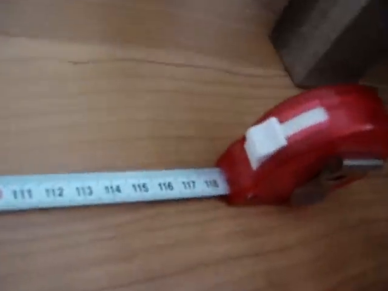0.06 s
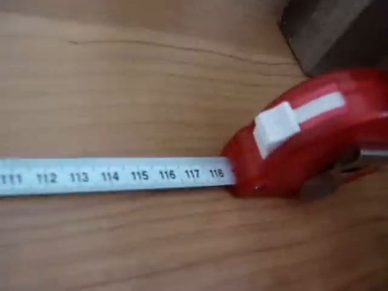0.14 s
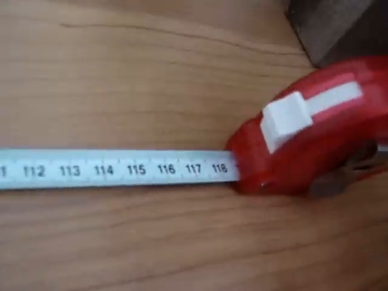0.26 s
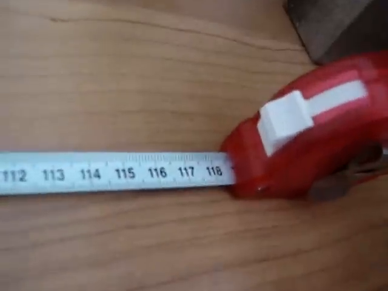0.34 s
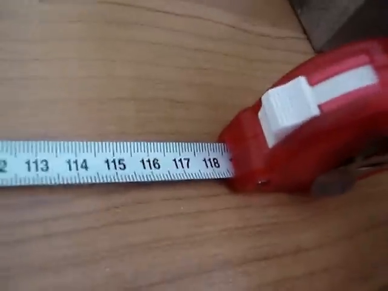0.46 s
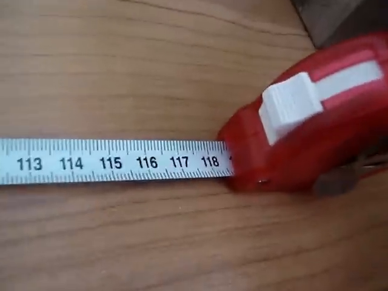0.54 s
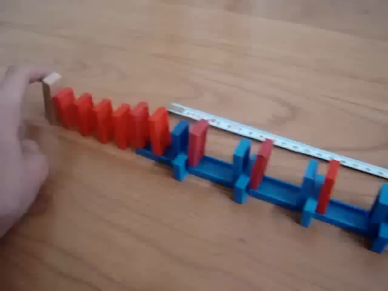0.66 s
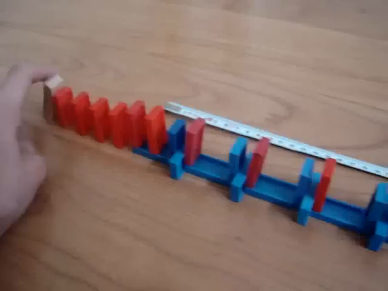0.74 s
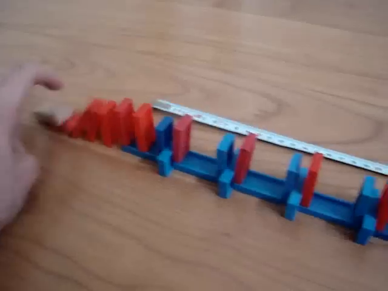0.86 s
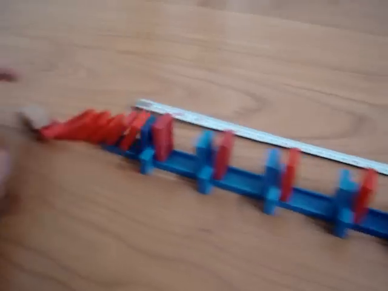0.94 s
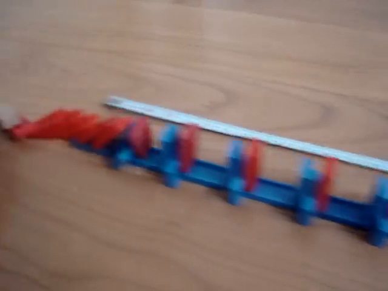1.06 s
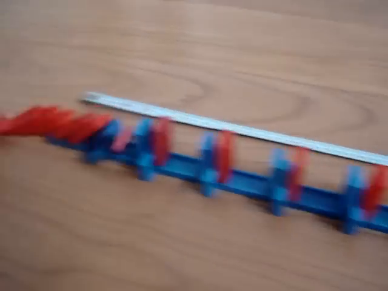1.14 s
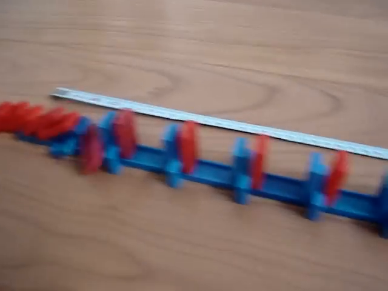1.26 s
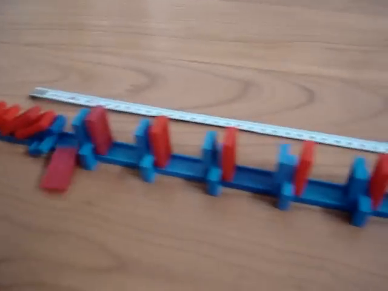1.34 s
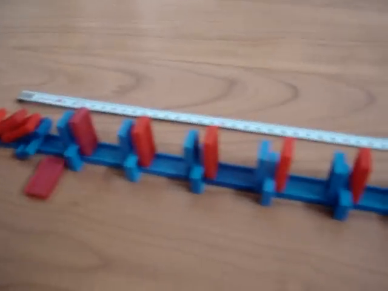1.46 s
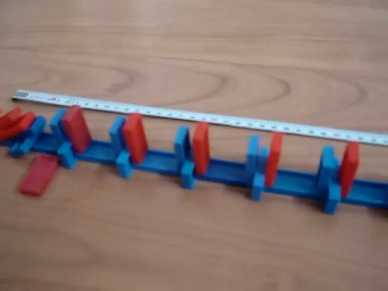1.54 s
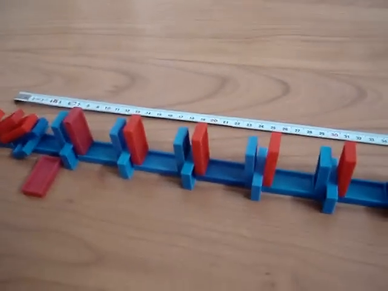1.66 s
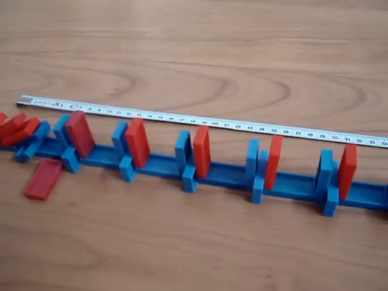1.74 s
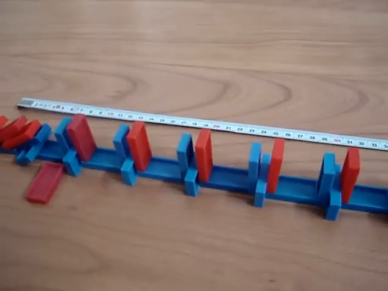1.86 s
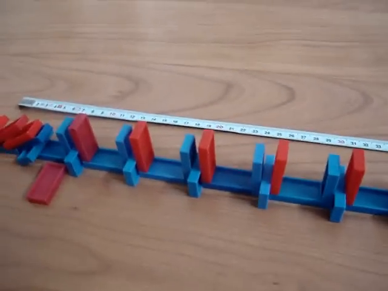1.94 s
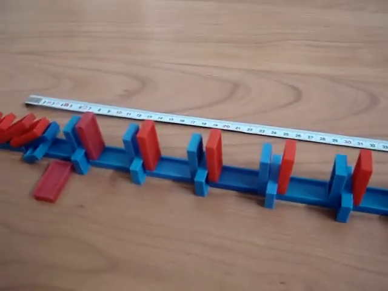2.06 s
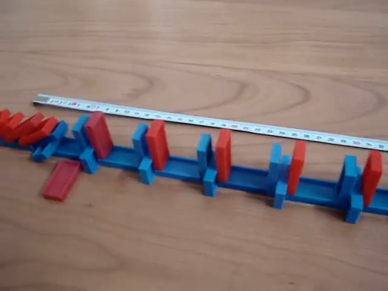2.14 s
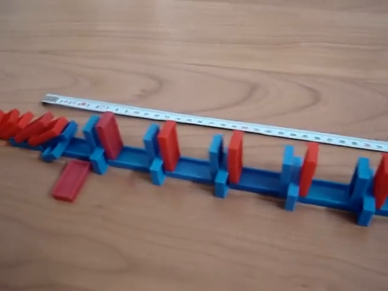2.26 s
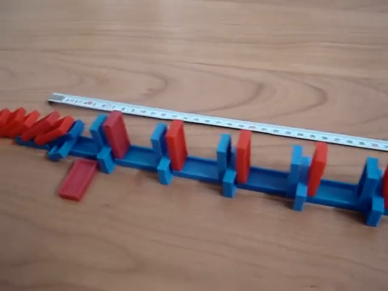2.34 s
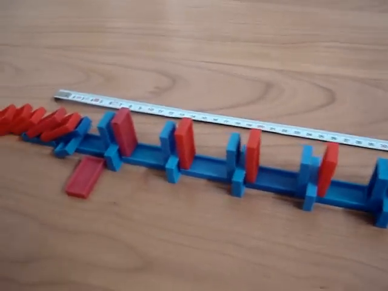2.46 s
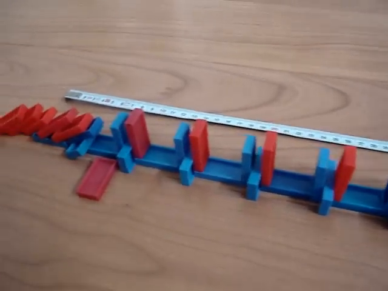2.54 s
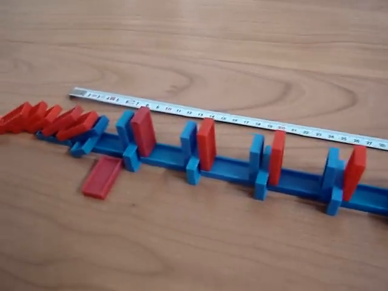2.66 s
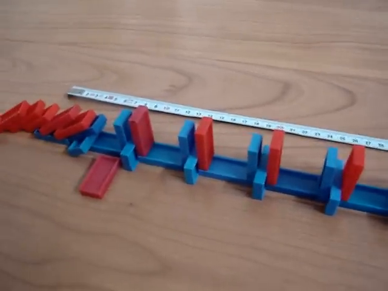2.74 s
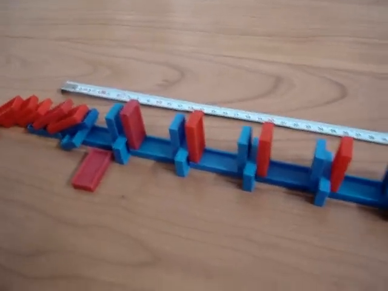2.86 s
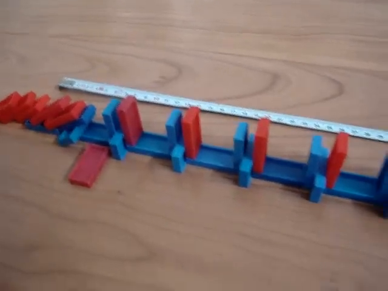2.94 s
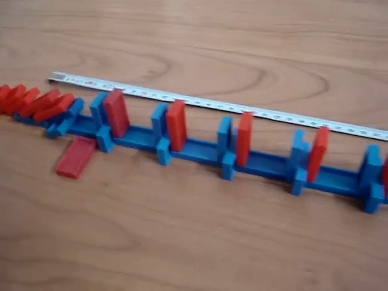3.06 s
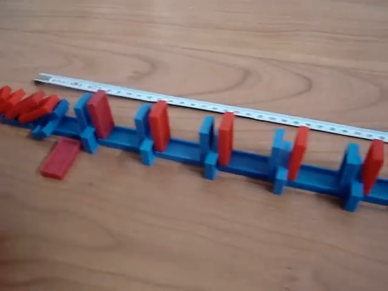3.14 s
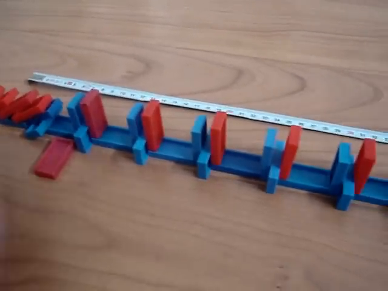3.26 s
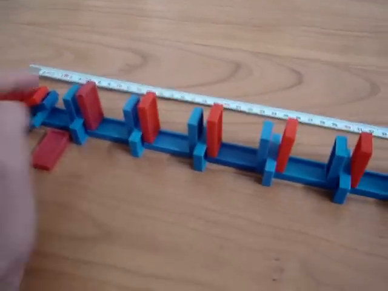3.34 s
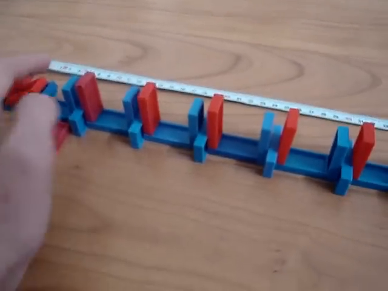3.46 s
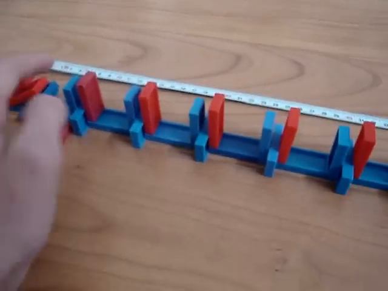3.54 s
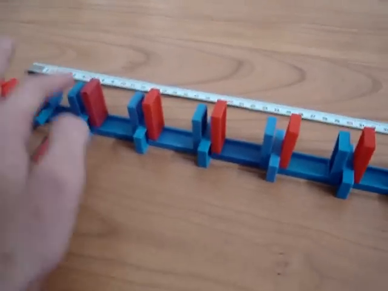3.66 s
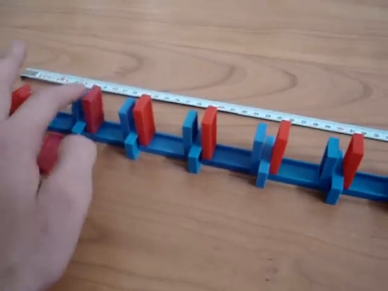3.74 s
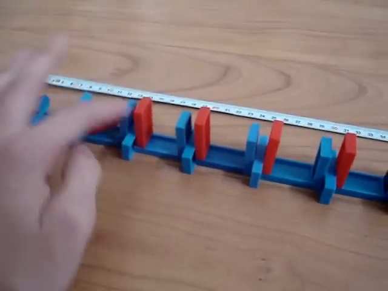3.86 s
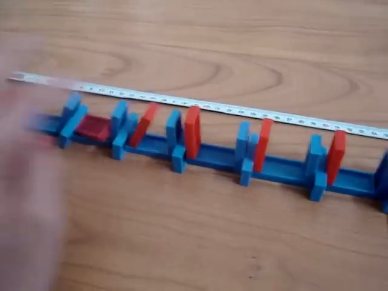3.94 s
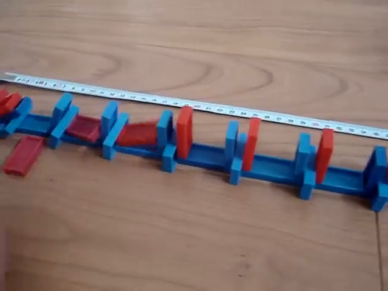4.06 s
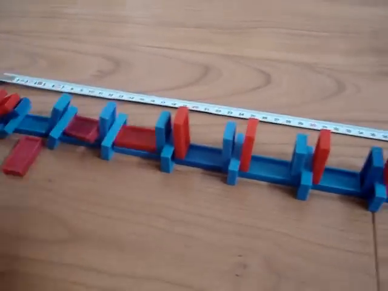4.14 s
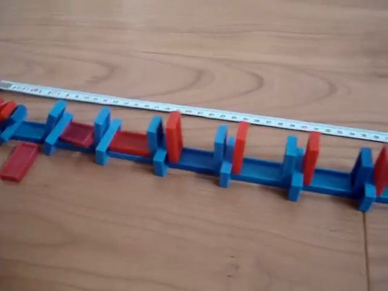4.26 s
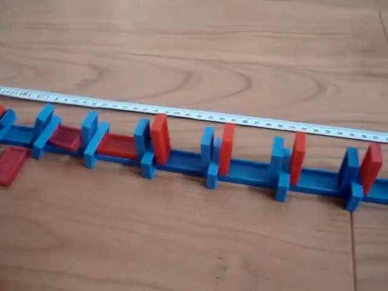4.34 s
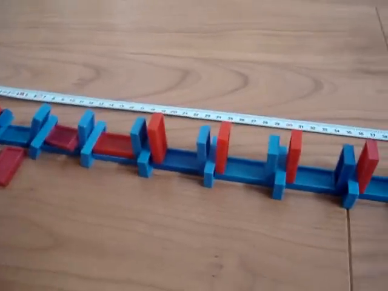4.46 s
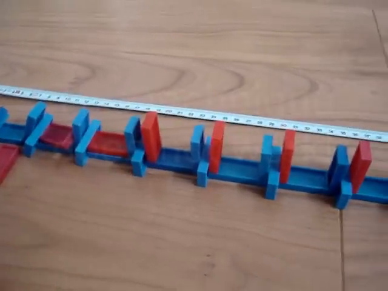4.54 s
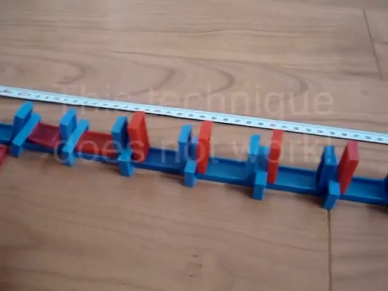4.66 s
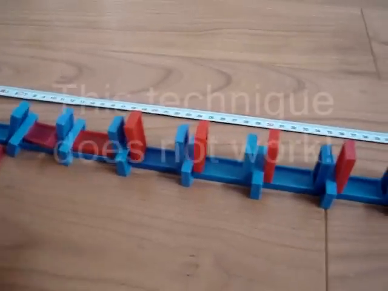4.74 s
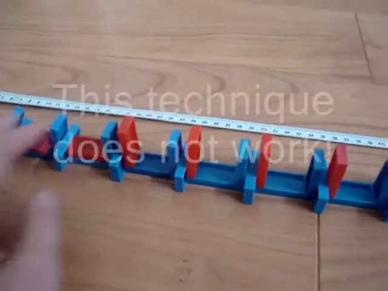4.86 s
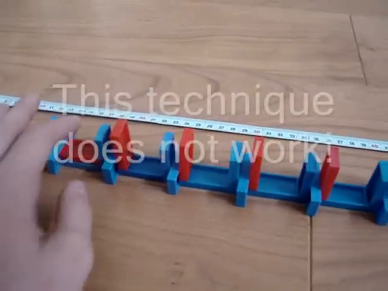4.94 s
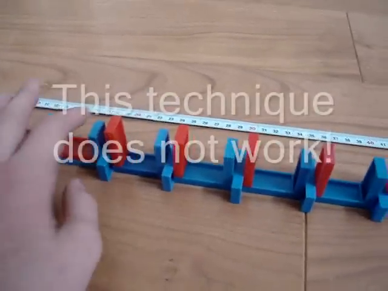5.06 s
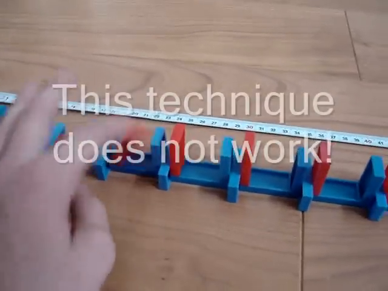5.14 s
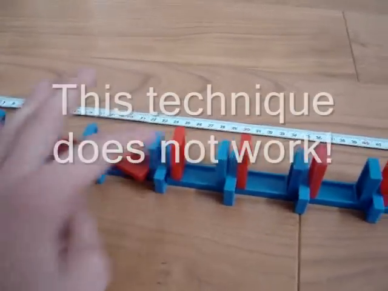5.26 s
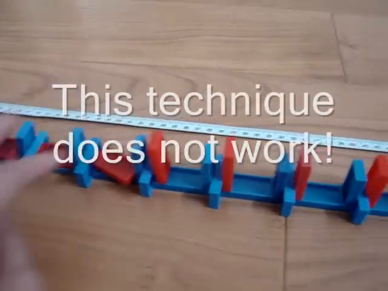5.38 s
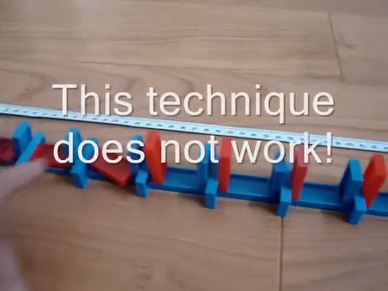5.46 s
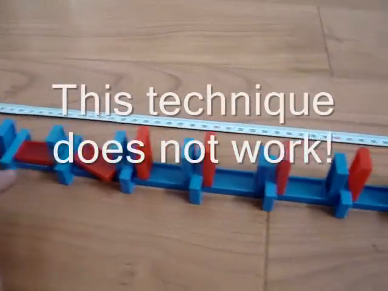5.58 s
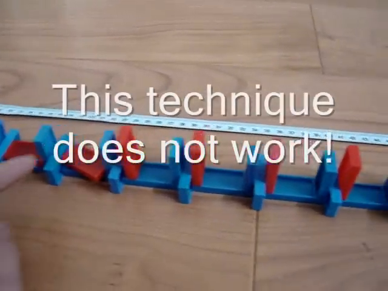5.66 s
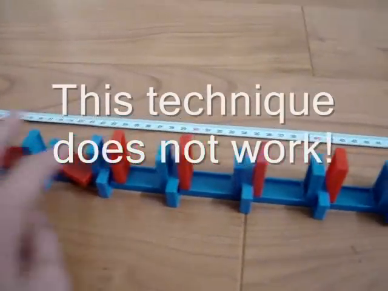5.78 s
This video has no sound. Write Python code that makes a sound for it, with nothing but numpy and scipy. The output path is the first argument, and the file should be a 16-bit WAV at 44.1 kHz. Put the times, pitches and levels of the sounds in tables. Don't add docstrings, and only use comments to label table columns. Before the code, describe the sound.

A soft, low-leaning hiss is cut by a small dry camera button click, then the background changes abruptly. A row of plastic dominoes topples close by on a wooden floor in a dense, bright clatter with lively room echoes. After a quiet pause with faint hum and hiss, single pushed tiles clack in a shorter burst, and a final quick rattle follows after another gap.

```python
import sys
import numpy as np
from scipy import signal
from scipy.fft import rfft, irfft
from scipy.io import wavfile
from scipy.ndimage import uniform_filter1d

SR = 44100
rng = np.random.default_rng(int(sys.argv[2]) if len(sys.argv) > 2 else 0)


def dump_mix(stems):
    frames = np.atleast_2d(stems).T
    limited = np.clip(frames, -1, 1)
    pcm = np.round(limited * 32767).astype(np.int16)
    wavfile.write(sys.argv[1], SR, pcm)


def field_ratio(decibels):
    return 10 ** (np.asarray(decibels, dtype=float) / 20)


N = 256220
TIME = np.arange(N) / SR
BLOW = 2048
PLACES = 4
LAG_S = 0.0008
SCENE_CHANGE_S = 0.792

# (time [s], peak level [dB], second ring against the peak [dB])
FIRST_ROW = [(.899, -28.5, -22), (.9547, -2.5, -13), (.9642, -11, -22), (.9859, -1.5, 0.5),
             (1.0044, -7, 0.5), (1.0178, -17, 16), (1.0294, -21.5, 21), (1.0424, -7.5, -12),
             (1.0546, -10.5, -9), (1.0815, -24.5, 19), (1.0894, -6, -22), (1.1064, -6, -22),
             (1.1194, -15, -20), (1.1494, -9.5, 4.5), (1.271, -13, 4), (1.3117, -15, -10),
             (1.3855, -3.5, -13), (1.3908, -21, -17.5), (1.4364, -6.5, -12), (1.4398, -4.5, -19),
             (1.4691, -4.5, -21.5), (1.4804, -11.5, -8), (1.4936, -7, -22), (1.5234, -11, -16),
             (1.5453, -18.5, -20), (1.5758, -12, -20)]
# (time [s], peak level [dB], second ring [dB], edge tick [dB]),
# the last two against the peak
PUSHED_TILES = [(3.9642, -12.5, 9, 1), (3.9732, -7.5, -0.5, -19), (3.9774, -13.5, 4, -12),
                (3.9964, -23, -3, 2), (4.025, -24.5, 9.5, -10), (4.1476, -9.5, 5, -3),
                (4.1574, -13, -4, 4.5), (4.1874, -23, -6, 0), (4.2244, -22.5, -3, -5),
                (4.2479, -20.5, 9.5, 1), (4.2579, -21, 1, -9), (5.3289, -6.5, 0.5, -10),
                (5.3414, -20.5, 9, 5), (5.3535, -14.5, 4, 2)]
# (time [s], slap level [dB], boards against the slap [dB])
DULL_TAPS = [(.8986, -37.5, 22.5), (.9049, -18.5, -12), (1.2004, -14.5, -7.5), (1.271, -24, -0.5),
             (1.3063, -23, -13), (3.044, -43, 12), (3.8162, -26.5, 3), (3.9223, -24, 1), (3.9329, -30, 9.5),
             (4.0961, -27, 0.5), (4.2579, -9, -18), (5.2675, -29, 0), (5.675, -39.5, -25),
             (5.76, -42.5, -1)]
# (time [s], peak level [dB], pitch [Hz], edge ring against the peak [dB])
FLAT_LANDINGS = [(1.1494, -12, 4200, -24), (1.3114, -8, 4310, -17), (1.323, -30, 3960, -23),
                 (1.3865, -7.5, 3200, -26), (1.39, -13.5, 2350, -29), (1.419, -10.5, 6400, -18),
                 (1.5284, -4.5, 4180, -36), (2.1224, -41, 2070, -20), (3.3294, -41, 2200, -16),
                 (3.817, -18.5, 5230, -30), (3.9214, -23.5, 3290, -26), (4.094, -14, 5280, -32),
                 (4.2245, -15.5, 4600, -9), (4.248, -14, 3150, -10.5), (4.2574, -25.5, 2770, -1.5),
                 (5.3326, -13, 5500, -30), (5.3447, -12, 5170, -30), (5.3654, -8.5, 3650, -24),
                 (5.3772, -11.5, 4300, -10), (5.3894, -4, 4600, -12), (5.405, -9, 3950, -24),
                 (5.4232, -6.5, 4720, -30), (5.4495, -19, 4500, -7)]
# (time [s], level [dB])
HEAP_CHATTER = [
    [(0.95, -20), (0.956, -15.5), (0.98, -14), (0.988, -12.5), (1.158, -19.5), (1.24, -40)],
    [(1.43, -41), (1.434, -45), (1.44, -27.5), (1.586, -26), (1.6, -58)],
    [(3.96, -27), (3.974, -28), (3.998, -28), (4.06, -53)],
]
# (time [s], peak level [dB], thump through the floor [dB])
HARD_CONTACTS = [(.899, -19, -61), (0.954, -16, -49), (.986, 3.5, -36), (1.2, -10, -67), (1.271, -10, -72),
                 (1.385, -1, -75), (1.439, 0, -63), (1.529, 0, -59), (3.042, -25.5, -78), (3.816, -18, -78),
                 (3.964, -0.5, -38.5), (4.095, -11.5, -70), (4.148, -13, -45), (4.224, -15, -65),
                 (4.247, -0.5, -62), (5.267, -43, -56), (5.328, -1, -48), (5.3651, -18, -46),
                 (5.3763, 9.5, -40), (5.4225, -10.5, -53)]

# (pitch [Hz], level [dB], time to fall by 60 dB [s])
TILE_RING = [(4881, 11.5, 0.04), (4760, 4.5, .012), (4933, 8.5, 0.035)]
SECOND_RING = [(6170, 8.5, 0.0084), (5640, -0.5, 0.017), (7020, -14.5, 0.032)]
FACE_SLAP = [(2480, -42.5, 0.012), (2964, 9, 0.01), (3500, 13.5, 0.005), (4020, 10, 0.0057)]
FLOOR_BOARDS = [(670, -4, 0.048), (920, 3.5, 0.0083), (1202, 1, 0.017), (1790, 11.5, 0.0033)]
TILE_EDGE = [(8030, -1, 0.018), (8950, -11, 0.06), (7270, 3, 0.013), (11240, -12.5, 0.0088),
             (12000, -12.5, 0.0036), (12900, -11, 0.0039), (13600, -27, .006), (14700, -11, 0.0054)]
# (lowest [Hz], highest [Hz])
SCRAPE_BAND = [4500, 8620]
# (band start [Hz], time to fall by 60 dB [s], level [dB])
ROOM_BANDS = [(100, 0.1, -36.5), (496, 0.59, -25.5), (1500, 0.5, -24.5), (3500, 0.44, -26.5),
              (4546, 0.3, -31), (5280, 0.4, -27.5), (6800, 0.39, -31), (12500, 0.48, -16.5)]

# (time [s], level [dB], tones as (pitch [Hz], level [dB], time to fall by 60 dB [s]))
CAMERA_BUTTON = (.7358, -4.5, [(4100, -4.5, 0.0096), (3600, -0.5, 0.0038), (1180, -12, .01),
                 (1890, -5, 0.0034), (5500, -6, 0.0037), (7850, -18.5, 0.0035), (13200, -26, .003)])
# (pitch [Hz], level per Hz [dB])
FIRST_HISS = [(15, -73), (25, -43), (70, -26), (119, -7.5), (161, -21), (194, -2), (261, -19), (283, -7.5),
              (391, -3), (746, -8.5), (1500, -13), (7790, -22.5), (15700, -27)]
# (pitch [Hz], level per Hz [dB])
SECOND_HISS = [(15, -34), (25, -18), (118, -12), (195, -7.5), (226, -16.5), (276, -3), (373, -13),
               (479, -13.5), (631, -14), (752, -13), (1550, -18.5), (7900, -26.5), (9900, -30),
               (12900, -61), (21800, -120)]
# (time [s], pitch [Hz], level [dB])
MOTOR_HUM = [
    (0.8, 275.6, -51.5),
    (1.01, 275.3, -45.5),
    (1.11, 274.3, -62),
    (1.53, 276.3, -61),
    (1.68, 274.1, -62.5),
    (3.24, 275.7, -53.5),
    (4.4, 275.4, -57.5),
    (5.31, 275.3, -55),
    (5.81, 275.6, -86),
]
# (pitch [Hz], width [Hz], level [dB])
WHINES = [(198.3, 15, -66), (7866, 69, -69.5), (8720, 52, -76.5), (7070, 10, -80.5), (12000, 80, -93.5),
          (15000, 6, -108.5), (2255, 230, -70.5), (753, 52, -69.5)]
# (time [s], change in level [dB])
TURN_DOWNS = [
    (1.5, -7),
    (4.1, -3),
    (5.45, -6),
]
# (start [s], end [s], thinned above
# [Hz], change in level [dB])
THIN_TREBLE = [(0.719, .733, 3200, -11), (0.787, 0.796, 110, -37), (0.868, .895, 3300, -5),
               (.938, 0.951, 3400, -11), (0.97, 0.987, 4200, -12), (1.26, 1.268, 6400, -9),
               (1.371, 1.38, 2000, -9.5), (1.404, 1.42, 3880, -14), (1.422, 1.436, 3900, -11),
               (3.786, 3.816, 3900, -15), (3.89, 3.913, 2600, -4), (4.225, 4.248, 6400, -13),
               (5.293, 5.323, 1500, -20), (5.367, 5.376, 6800, -7)]


def dominoes():
    places = np.zeros((PLACES, N))
    edge_db = -7
    knocks = [(*row, edge_db) for row in FIRST_ROW] + PUSHED_TILES
    for k, (s, db, second_db, edge_db) in enumerate(knocks):
        add(places[k % PLACES], s + LAG_S, knock(db, -6.5, second_db, -15, edge_db))
    for k, (s, db, boards_db) in enumerate(DULL_TAPS):
        add(places[k % PLACES], s + LAG_S, tap(db, boards_db))
    for k, (s, *settings) in enumerate(FLAT_LANDINGS):
        add(places[k % PLACES], s + LAG_S, landing(*settings))
    for rows in HEAP_CHATTER:
        chatter(places, rows)
    return places


def knock(db, slap_db, second_db, boards_db, edge_db):
    body = ring(TILE_RING, 0.003, 1.5)
    body = body + field_ratio(second_db) * ring(SECOND_RING, 0.006, 3)
    body = body + field_ratio(slap_db) * ring(FACE_SLAP, 0.05, 3)
    body = body + field_ratio(boards_db) * ring(FLOOR_BOARDS, 0.1, 3)
    body = body + field_ratio(edge_db) * ring(TILE_EDGE, 0.006, 3)
    swell_s = 0.0001
    return -field_ratio(db - 4.5) * body * np.minimum(TIME[:BLOW] / swell_s, 1)


def tap(db, boards_db):
    ring_db, second_db, edge_db = -10.5, -10, -9
    return knock(db + ring_db, -ring_db, second_db - ring_db, boards_db - ring_db, edge_db - ring_db)


def landing(db, hz, edge_db):
    tones = [(hz, 0, 0.009), (0.926 * hz, -3, 0.007), (1.144 * hz, -1.5, 0.007), (1.266 * hz, -4, 0.006)]
    slap = ring(tones, 0.039, 4.5)
    edge = field_ratio(edge_db) * ring([(9090, -6.5, 0.018), (8100, -9, 0.02)], 0, 0)
    scrape = band(rng.standard_normal(BLOW), *SCRAPE_BAND, order=3)
    scrape = field_ratio(-14) * scrape * np.exp(-TIME[:BLOW] / 0.0028)
    swell = np.minimum(TIME[:BLOW] / 0.00052, 1)
    return field_ratio(db + 2.0) * (slap + edge + scrape) * swell


def chatter(places, rows):
    s, db = np.transpose(rows)
    length_s = s[-1] - s[0]
    knocks = rng.random((int(200 * length_s), 2))
    for k, (moment, size) in enumerate(knocks):
        when = s[0] + moment * length_s
        knock_db = np.interp(when, s, db) - 7 - 3.35 * np.log(size)
        add(places[k % PLACES], when, knock(knock_db, -2.8, -5.0, -17, 5.8))


def ring(tones, detune, scatter_db):
    t = TIME[:BLOW]
    out = np.zeros(BLOW)
    for hz, db, fade_s in tones:
        off_pitch, off_level = rng.standard_normal(2)
        tone = np.sin(2 * np.pi * hz * (1 + detune * off_pitch) * t)
        out += field_ratio(db + scatter_db * off_level) * tone * 1000 ** (-t / fade_s)
    return out / np.abs(out).max()


def hard_contacts():
    out = np.zeros(N)
    t = TIME[:4096]
    thump = np.sin(2 * np.pi * 28 * t) * np.exp(-t / 0.021) * np.minimum(t / 0.0033, 1)
    for s, db, thump_db in HARD_CONTACTS:
        contact_ms = max(0.052 - 0.0006 * db, 0.02)
        add(out, s + LAG_S, field_ratio(db + 5.0) * crack(contact_ms / 1000))
        add(out, s, field_ratio(thump_db + 2.5) * thump)
    out = out - band(out, 90, 350)
    rounded = signal.butter(1, 11000, fs=SR, output="sos")
    return signal.sosfilt(rounded, out)


def crack(length_s):
    t = TIME[:BLOW] / length_s
    return -(1 - t / 2) * np.exp(-t) * np.minimum(t * 4, 1)


def room(x):
    t = TIME[:SR * 3 // 4]
    tops = [hz for hz, _, _ in ROOM_BANDS[1:]] + [16000]
    tail = np.zeros(len(t))
    for (hz, fade_s, db), top in zip(ROOM_BANDS, tops):
        echoes = band(rng.standard_normal(len(t)), hz, top)
        tail += field_ratio(db) * 1000 ** (-t / fade_s) * echoes
    onset = np.clip((t - 0.001) / 0.002, 0, 1)
    early = field_ratio(6.5 * np.exp(-(t / 0.014) ** 4))
    return signal.fftconvolve(x, tail * onset * early)[:N]


def button():
    out = np.zeros(N)
    s, db, tones = CAMERA_BUTTON
    add(out, s, -field_ratio(db) * ring(tones, 0, 0) * np.minimum(TIME[:BLOW] / 0.00019, 1))
    return out


def background():
    return np.where(TIME < SCENE_CHANGE_S, first_noise(), second_noise() + motor())


def first_noise():
    hiss = level(coloured(FIRST_HISS), -51) * field_ratio(0.24 * walk(5))
    return hiss + field_ratio(-69) * narrow(195, 25) + field_ratio(-64) * narrow(407.5, 12)


def second_noise():
    treble_db = -39.5
    hiss = coloured(SECOND_HISS[:-2] + [(10200, treble_db), (15700, treble_db + 2.5)])
    hiss = hiss / band(hiss, 400, 2000, order=4).std()
    gain_db = np.full(N, -55.0)
    for s, db in TURN_DOWNS:
        drop = np.clip((TIME - s) / 0.052, 0, 1)
        gain_db += db * drop * np.exp(-np.abs(TIME - s) / 1.34)
    whines = sum(field_ratio(db + 58.0) * narrow(hz, width) for hz, width, db in WHINES)
    return field_ratio(gain_db) * (field_ratio(0.29 * walk(17)) * hiss + whines)


def motor():
    loudness = curve([(s, db) for s, _, db in MOTOR_HUM])
    return loudness * (1.31 * np.sin(2 * np.pi * 275 * TIME) + 0.12 * narrow(272, 8))


def coloured(points):
    hz, db = np.transpose(points)
    log_hz = np.log(np.fft.rfftfreq(N, 1 / SR) + 1)
    shape = field_ratio(np.interp(log_hz, np.log(hz), db))
    return irfft(rfft(rng.standard_normal(N)) * shape, N)


def narrow(hz, width_hz):
    off = (np.fft.rfftfreq(N, 1 / SR) - hz) / (width_hz / 2)
    return level(irfft(rfft(rng.standard_normal(N)) / (1 + off ** 2), N), 0)


def walk(rate):
    k = int(SR / rate)
    steps = np.repeat(rng.standard_normal(N // k + 1), k)
    return 0.43 * uniform_filter1d(uniform_filter1d(steps, k), k)[:N]


def curve(rows):
    s, db = np.transpose(rows)
    return field_ratio(np.interp(TIME, s, db, left=-120, right=-120))


def level(x, db):
    return x * field_ratio(db) / np.sqrt(np.mean(x ** 2))


def band(x, low_hz, high_hz, order=2):
    return signal.sosfilt(signal.butter(order, [low_hz, high_hz], "band", fs=SR, output="sos"), x)


def add(out, s, y):
    i = int(s * SR)
    out[i:i + len(y)] += y[:len(out) - i]


def scene():
    tiles, contacts = dominoes(), hard_contacts()
    echoes = sum(room(place) for place in tiles)
    echoes = echoes + room(0.12 * contacts)
    return (tiles.sum(axis=0) + contacts + echoes + button() + background())[None]


def limit(x):
    pole = np.exp(-1 / (0.0014 * SR))
    loud = np.sqrt(signal.lfilter([1 - pole], [1, -pole], x ** 2))
    ratio = 2.2
    return x * np.maximum(loud / field_ratio(-13), 1) ** (1 / ratio - 1)


def thin_treble(x):
    for start, end, hz, db in THIN_TREBLE:
        a, b = int(start * SR) - 500, int(end * SR) + 500
        inside = (TIME[a:b] > start) & (TIME[a:b] < end)
        gate = uniform_filter1d(inside * 1.0, size=60)
        treble = signal.sosfiltfilt(signal.butter(6, hz, "high", fs=SR, output="sos"), x[a:b])
        x[a:b] -= (1 - field_ratio(db)) * gate * treble
    return x


def top_cut(x):
    return signal.sosfilt(signal.butter(12, 16960, fs=SR, output="sos"), x)


def record(dry):
    x = thin_treble(limit(dry[0]))
    x = np.tanh(0.8 * x) / 0.8
    x = signal.sosfilt(signal.ellip(8, 0.2, 40, 15750, fs=SR, output="sos"), x)
    return top_cut(x[None])


dry = scene()
out = record(dry)
dump_mix(out)
```